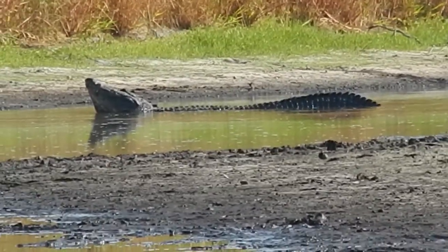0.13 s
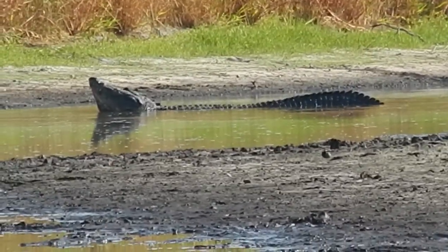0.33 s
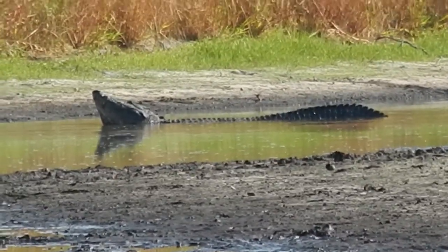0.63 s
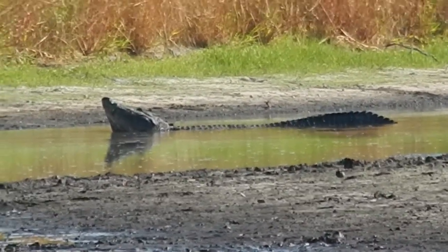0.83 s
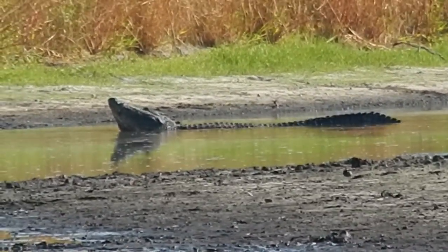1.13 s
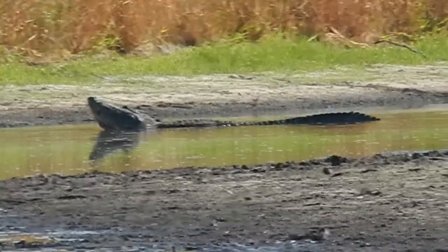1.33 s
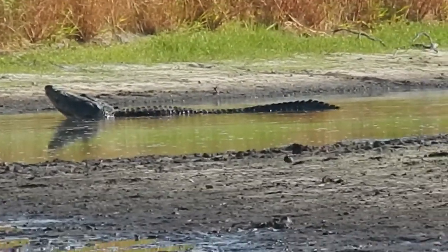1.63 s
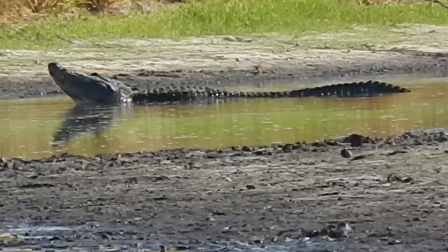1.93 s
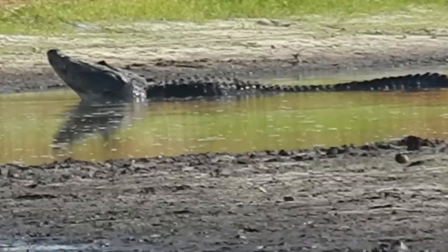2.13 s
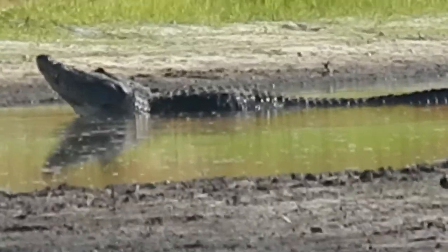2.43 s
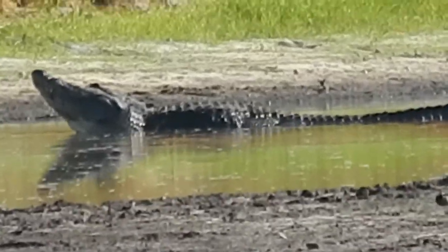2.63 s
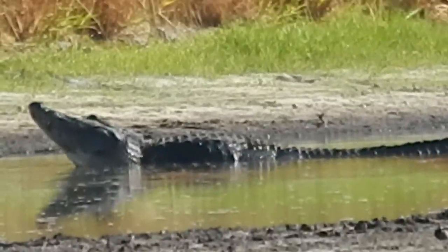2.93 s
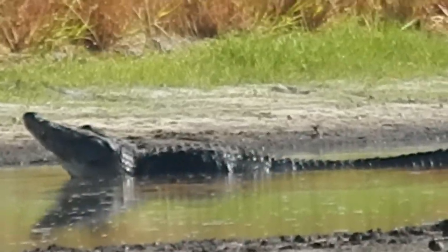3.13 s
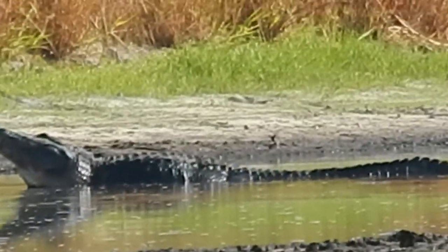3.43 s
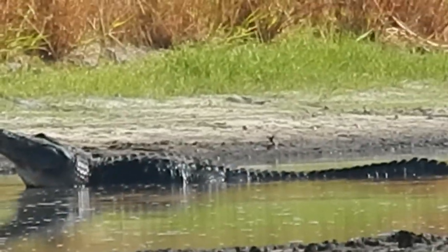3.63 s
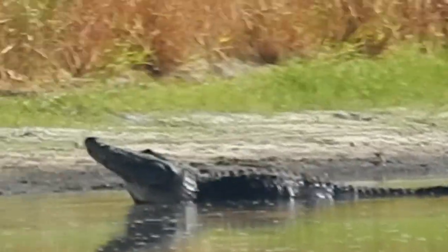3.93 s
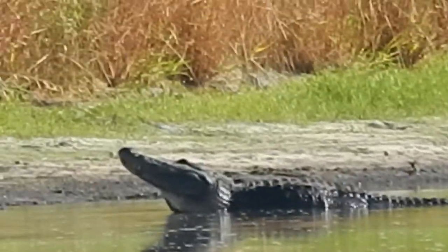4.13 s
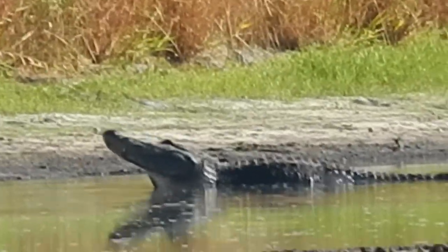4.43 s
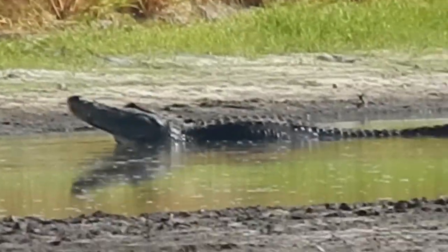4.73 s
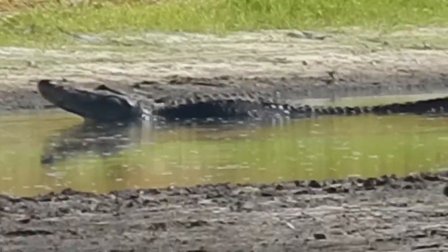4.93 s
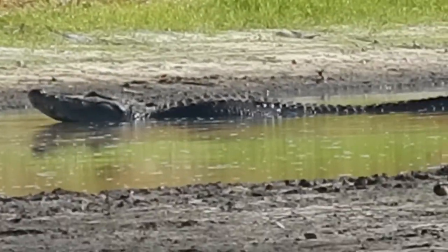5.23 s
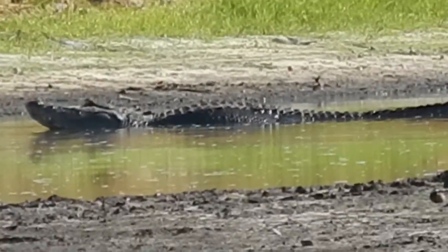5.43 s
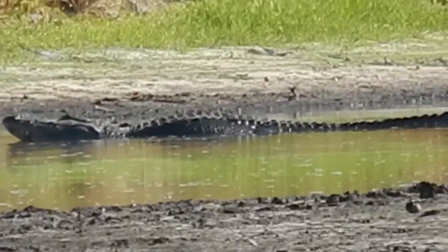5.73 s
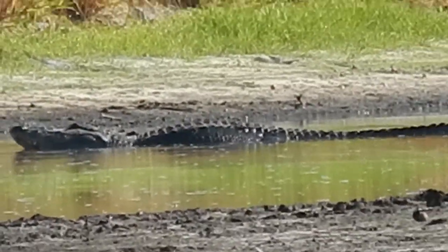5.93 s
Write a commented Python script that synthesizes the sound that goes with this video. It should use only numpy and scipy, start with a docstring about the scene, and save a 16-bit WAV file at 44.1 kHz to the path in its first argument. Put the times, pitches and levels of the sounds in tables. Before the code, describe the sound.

Outdoors at a shallow pond, an alligator's very low, throbbing bellow slows into separate thuds and ends within about a second and a half. Wind rumbles softly and insects chirp high. A bird rattles, then one loud dry plastic click snaps close to the microphone. Thin bird wails follow, each breaking into raspy pulses, then two creaking croaks, while a lens motor whirs faintly.

```python
"""A shallow pond seen from its bank: an alligator ends a low bellow, pulses of vocal-fold closure ringing its throat.
A wading bird rattles, gives three thin harmonic wails that break into rasping pulses, then two creaking calls.
Insects chirp and lisp as noise in narrow resonances; a far bird peeps; wind, far hiss and a far motor lie beneath.
At the camera, a zoom motor ticks faintly, a dry scuff and small ticks pass, and contacts ring the body's modes.
One sharp click there makes the limiter duck."""
import sys
import numpy as np
from scipy import signal
from scipy.fft import rfft, irfft, next_fast_len
from scipy.io import wavfile

SR = 44100
rng = np.random.default_rng(int(sys.argv[2]) if len(sys.argv) > 2 else 0)


def store_pcm(level_fs):
    """Save levels as 16-bit WAV."""
    pcm = np.round(np.clip(level_fs, -1, 1) * 32767).astype(np.int16)
    wavfile.write(sys.argv[1], SR, np.atleast_2d(pcm).T)


N = 267598
TIME = np.arange(N) / SR

# Alligator's vocal-fold closures: (time [s], rate [1/s], peak level before trim and scatter [dB])
BELLOW = [(0, 37.9, -27), (.12, 33.8, -29), (.31, 31.8, -28), (.43, 28.5, -33), (.62, 28.1, -30),
          (.68, 19.5, -33), (.77, 27, -28), (.97, 24.15, -29), (1.32, 20.4, -36)]
# Its throat resonances before narrowing: (frequency [Hz], width [Hz], gain [dB])
GATOR_THROAT = [(106, 40, 7.5), (158, 48, 16.5)]
# Narrowing of the throat during the push: (time [s], factor on the resonances [1])
SQUEEZE = [(0, 0.55), (.15, 0.75), (.3, 0.92), (.7, 1), (1.3, 1)]
# Turbulent rumble under the slaps, before trim: (time [s], level [dB])
RUMBLE = [(0, -37), (.6, -47), (1.2, -51), (1.6, -64)]

# Open air before gain: (time [s], wind level [dB], far hiss level [dB])
AIR = [(0, -44.5, -62.5), (1.2, -47, -62.5), (2.5, -47.5, -62.5), (3.1, -48, -62.5), (4.4, -50, -61.5),
       (5.0, -47.5, -62), (6.07, -50.5, -61.5)]
# Spectrum of the wind: (frequency [Hz], relative level per Hz [dB])
WIND = [(12, -44), (20, -7), (32, -4), (65, 3.5), (97, 0), (136, -3.5), (200, -9.5), (280, -12.5),
        (390, -19.5), (580, -32.5), (1000, -72)]
# Spectrum of the far hiss: (frequency [Hz], relative level per Hz [dB])
HISS = [(180, -32), (300, -9.5), (398, -2.5), (614, -7), (930, -5.5), (1230, -8), (1460, -9.5), (2480, -14),
        (4830, -18), (5610, -13), (6300, -22), (8940, -18.5), (11300, -21.5), (13800, -24), (16000, -28.5)]
# Left-right likeness, negative values counting as none: (frequency [Hz], likeness [1])
LIKENESS = [(60, 0.93), (150, 0.84), (380, 0.45), (950, 0.26), (2380, 0.0013), (5980, -1), (15000, -0.21)]
# Wind puffs on the microphone: (centre time [s], Gaussian spread [s], level before panning [dB])
PUFFS = [(0.164, 0.023, -41.5), (0.551, 0.056, -44.5), (0.928, .015, -47), (1.008, 0.016, -45.5),
         (1.44, 0.027, -51)]

# Near insect chirps over the chorus, before trim: (centre time [s], level [dB])
CHIRPS = [(.12, -63), (.45, -59), (0.768, -61), (1.42, -61), (1.76, -64), (2.03, -63.5), (2.68, -60),
          (3.0, -65), (3.38, -63), (3.58, -63), (4.33, -62), (4.55, -66), (4.84, -64), (5.091, -63),
          (5.3, -62), (5.56, -64.5), (5.86, -60)]
CHIRP_S, CHORUS_DB = 0.14, -69  # chirp length; chorus level before trim and swell
# Peeps of a small far bird: (centre time [s])
PEEPS = [.12, .765, 1.235, 1.37]
# Lisps of a second insect: (centre time [s])
LISPS = [.29, .575, .86, 1.165, 1.47, 1.78, 4.11, 4.37, 4.62, 4.94, 5.21, 5.55, 5.88]

# Contacts on the camera body: (time [s], strength [dB])
CLICKS = [(.449, -35.5), (.982, -41), (2.193, -38.5), (2.1962, -36), (2.2211, -17), (2.2228, -8.5),
          (2.2255, -16.5), (3.956, -46), (5.732, -45.5)]
# Modes of the camera body: (frequency [Hz], gain [dB], 60 dB decay time [s])
BODY = [(229, -17.5, 0.031), (500, -21, 0.01), (800, -25, 0.076), (1300, -14.5, 0.019),
        (1545, -10.5, 0.017), (2024, -16.5, 0.026), (2360, -11, 0.036), (2656, -3, 0.011),
        (3350, -3.5, 0.0089), (4590, -8.5, 0.0059), (5180, -10.5, 0.0047), (7650, -14.5, 0.0029),
        (10100, -13, 0.0028), (11500, -11.5, .005), (13300, -17, .0028)]

# Runs of the bird's rattle: (first note [s], end [s], level before trim and swell [dB], rasp before trim [dB])
RATTLE = [(0.618, .7, -50, -2.5), (1.432, 1.78, -41.5, -2), (2.278, 2.3, -42, -4), (2.665, 2.69, -41, -6.5),
          (3.256, 3.34, -40.5, -4.5), (3.611, 3.64, -44, -6), (4.143, 4.22, -41.5, -3),
          (4.473, 4.5, -39, -7), (5, 5.03, -39.5, -6), (5.255, 5.39, -40.5, -6.5), (5.84, 5.87, -41, -4.5)]
RATTLE_STEP_S, RATTLE_NOTE_S, RATTLE_RELEASE_S = 0.054, 0.019, 0.013  # note spacing, length and release
# A run swells: notes this far from its middle are this much softer
RATTLE_SWELL_S, RATTLE_SWELL_DB = 0.16, 5.5
# Long creaks: (start [s], end [s], pulse rate before jitter [Hz], throat at start [Hz], throat at end [Hz],
# level [dB], roughness [0-1])
CREAKS = [(2.445, 2.51, 171.3, 1210, 1290, -55, .2), (2.491, 2.543, 160, 1810, 1930, -52.5, 0.7),
          (2.578, 2.644, 180, 1890, 1780, -51, .4), (3.528, 3.594, 200, 1160, 1360, -53.5, .7),
          (4.39, 4.447, 196.2, 1240, 1420, -50, 0.61), (5.052, 5.094, 184, 1110, 1220, -41.5, .04),
          (5.09, 5.125, 218, 1370, 1330, -46, .2), (5.146, 5.178, 183, 1080, 1370, -44.5, .12),
          (5.204, 5.226, 220, 1070, 1300, -43.5, .2), (5.891, 5.992, 190, 1130, 1240, -45, .04),
          (5.985, 6.042, 183, 1380, 1150, -48.5, .24), (6.04, 6.072, 223.7, 1520, 1530, -56.5, 0.79)]
CLEAN_RASP_DB, ROUGH_RASP_DB = -3.5, 10  # rasp against throat tone in a clean and in a fully rough creak
# Spectrum of the rasp: (frequency [Hz], relative level per Hz [dB])
RASP = [(500, -24), (900, -3), (1300, -4), (1800, -4), (2100, -9.5), (2450, -9), (2900, -8.5), (3900, -3.5),
        (4700, -7.5), (6500, -17.5), (8000, -21.5), (10200, -19), (12000, -29), (16000, -58)]

# Swells of the far motor: (start [s], end [s], initial speed [Hz], final speed [Hz], level [dB],
# fade [dB/s], step from one order to the next [dB])
MOTOR = [(1.746, 2.28, 51.07, 49.33, -47.5, 1.5, -3.5), (2.253, 3.0, 48.8, 44.82, -57.5, 9.5, 3),
         (2.955, 4.503, 65.6, 65.14, -54.5, 6, -3.5), (4.947, 6.117, 76.78, 88, -43.5, 7, -27)]
MOTOR_SETTLE_S = 0.348  # time constant of the approach to the final speed

# Zoom motor: (time [s], tick rate [1/s], level [dB])
ZOOM = [(2.0, 52, -100), (2.03, 38, -64.5), (2.3, 46, -61), (2.6, 56, -58.5), (3.05, 50, -62.5),
        (3.5, 48, -60), (3.86, 48, -61.5), (3.89, 56, -100)]
# Spectrum of its ticks and whirr: (frequency [Hz], relative level per Hz [dB])
WHIRR = [(3000, -51), (7000, -23), (10300, -12), (11200, 3.5), (11700, -4), (12100, -5), (12700, -1),
         (13200, -1), (15500, -5), (16500, -3.5)]

# Notes of the wails, high ones breaking to lower ones: (start [s], end [s], initial pitch [Hz], sag [Hz],
# level [dB], second partial before trim [dB], brightness of the overtones [dB])
WAILS = [(2.283, 2.316, 1180, 7, -47, -9.5, -15.5), (2.347, 2.404, 1214, 15, -45, -13.5, -20.5),
         (2.412, 2.526, 1105, 17.5, -44, -8.5, -24), (2.573, 2.612, 1091, 39, -43, -10.5, -31),
         (3.316, 3.498, 1286, 96.5, -44.5, -10.5, -9), (3.502, 3.553, 1104, 58, -41, -16, -21),
         (4.196, 4.344, 1255, 66, -42, -17.5, -13.5), (4.352, 4.394, 1088, 32, -39.5, -17.5, -19.5)]
# Overtones of a wail before trim and brightness: (multiple of the pitch [1], relative level [dB])
OVERTONES = [(3, 8), (4, -7.5), (5, -7.5), (6, -19.5), (7, -15), (8, -13.5), (9, -19), (10, -24)]
# Cracks in the wail, every other cycle weaker: (time [s], depth [0-1])
CRACK = [(4.26, 0.08), (4.285, 0.75), (4.32, 0.15), (4.34, 0.05)]
WAIL_ARCH_DB = 2.5  # a note is this much softer at its ends
# The low partials fade as the note slides through this pitch
WEAK_HZ, WEAK_WIDTH_HZ, WEAK_DB = 1237.7, 15, 10.5

# Resonances of one dry scuff: (start [s], end [s], frequency [Hz], width [Hz], level [dB])
SCUFF = [(3.955, 3.99, 370, 210, -53), (4.015, 4.062, 830, 110, -58.5), (3.953, 4.072, 1917, 250, -58.5),
         (4.003, 4.05, 2500, 370, -62)]
# Crisp ticks before trim: (onset time [s], level [dB])
TICKS = [(4.9243, -41), (4.971, -46), (5.268, -40), (5.317, -39.5), (5.48, -50)]

# Echoes from the banks: (delay [s], level [dB])
BANKS = [(.017, -12.5), (0.041, -15), (.078, -28), (.125, -35)]
CUTOFF_HZ = 15900  # top of the recorded band


def from_db(db):
    """Decibel law: 20 dB is a tenfold amplitude."""
    return 10 ** (np.asarray(db) / 20)


def rms_one(x):
    """Normalization: scale to a root-mean-square amplitude of 1."""
    return x / np.sqrt(np.mean(x ** 2) + 1e-20)


def in_time(rows):
    """Linear interpolation: read every column of a time curve at each sample."""
    s, *columns = np.transpose(rows)
    return [np.interp(TIME, s, c) for c in columns]


def at_hz(points, hz):
    """Logarithmic frequency axis: interpolate a spectrum on it."""
    f, value = np.transpose(points)
    return np.interp(np.log(np.maximum(hz, 1)), np.log(f), value)


def colour(x, spectrum):
    """Linear filtering: multiply the Fourier spectrum by a smooth gain, then scale to rms 1."""
    size = next_fast_len(N)
    gain = from_db(at_hz(spectrum, np.fft.rfftfreq(size, 1 / SR)))
    return rms_one(irfft(rfft(x, size) * gain, size)[..., :N])


def cut(x, hz, kind, order=2):
    """Butterworth filtering: a maximally flat passband."""
    return signal.sosfilt(signal.butter(order, hz, kind, fs=SR, output="sos"), x + 1e-18)


def resonance(x, hz, width_hz):
    """Damped resonance: a pole pair whose radius sets the width, with unit gain at its peak."""
    r = np.exp(-np.pi * width_hz / SR)
    zeros = np.array([1, 0, -1]) * (1 - r * r) / 2
    poles = [1, -2 * r * np.cos(2 * np.pi * hz / SR), r * r]
    return signal.lfilter(zeros, poles, x + 1e-18)


def drift(rate):
    """Random modulation: chance values, rate of them a second, joined by lines and scaled to rms 1."""
    knots = rng.standard_normal(N // 8)
    return rms_one(np.interp(TIME * rate, np.arange(len(knots)), knots))


def gate(t, start, end, edge):
    """Amplitude envelope: 1 between start and end, with sloping edges."""
    rise = np.clip((t - start) / edge + 0.5, 0, 1)
    return rise * np.clip((end - t) / edge + 0.5, 0, 1)


def place(x, pan_db, lag_ms):
    """Stereo localization: level and arrival time differ at two ports, the left one hearing later."""
    left = np.interp(TIME - lag_ms / 1000, TIME, x) * from_db(pan_db / 2)
    return np.array([left, x * from_db(-pan_db / 2)])


def air_noise(spectrum):
    """Interchannel coherence: shared and opposed noise make the sides alike in the bass, less so above."""
    size = next_fast_len(N)
    alike = np.clip(at_hz(LIKENESS, np.fft.rfftfreq(size, 1 / SR)), 0, 0.98)
    mid, side = rfft(rng.standard_normal((2, size)))
    pair = np.sqrt(1 + alike) * mid + np.sqrt(1 - alike) * side * [[1], [-1]]
    return colour(irfft(pair, size)[:, :N], spectrum)


def outdoors(x, scatter_db, t60, dull_hz):
    """Reflection and scattering: dull echoes from the banks and a decaying tail from the reeds."""
    dull = cut(x, dull_hz, "low", order=1)
    echoes = sum(from_db(db) * np.interp(TIME - delay, TIME, dull, left=0) for delay, db in BANKS)
    tail = rng.standard_normal((2, SR)) * from_db(-60 * TIME[:SR] / t60)
    tail /= np.sqrt(np.sum(tail ** 2, axis=1, keepdims=True))
    return echoes + from_db(scatter_db) * signal.fftconvolve(dull[None], tail, axes=1)[:, :N]


def gator_throat(x, squeeze=1, top_hz=285):
    """Vocal-tract resonance: broad low modes; the closed mouth lets little treble out."""
    rings = sum(from_db(db) * resonance(x, hz * squeeze, width) for hz, width, db in GATOR_THROAT)
    return cut(rings, top_hz, "low", order=7)


def alligator(slap_db=-2.5, rumble_db=-7, uneven_db=2.15, jitter_s=0.00078):
    """Source and filter: fold closures, slowing overall, ring the throat over turbulent noise."""
    rumble = rms_one(gator_throat(rng.standard_normal(N)))
    out = from_db(in_time(RUMBLE)[0] + rumble_db) * rumble
    rate, db = in_time(BELLOW)
    new_cycle = np.diff(np.round(np.cumsum(rate) / SR))
    closures = np.flatnonzero(new_cycle * (TIME[1:] < BELLOW[-1][0]))
    for at, (colouring, size, late) in zip(closures, rng.standard_normal((64, 3))):
        squeeze = np.interp(at / SR, *np.transpose(SQUEEZE)) * (1 + 0.037 * colouring)
        slap = gator_throat(-signal.unit_impulse(SR // 8), squeeze)
        start = max(at + int(jitter_s * late * SR), 0)
        level = from_db(db[at] + slap_db + uneven_db * size)
        out[start:start + len(slap)] += level * slap / np.abs(slap).max()
    return out


def open_air(wind_gain_db=0.0, hiss_gain_db=6.5, puff_hz=45, puff_width_hz=35):
    """Flow noise: low wind, far hiss, and puffs that buffet the left port most."""
    wind_db, hiss_db = in_time(AIR)
    wind_level = from_db(wind_db + wind_gain_db + 0.19 * drift(8))
    wind = wind_level * air_noise(WIND) * from_db([[1.0], [-1.0]])
    hiss = from_db(hiss_db + hiss_gain_db) * air_noise(HISS)
    push = sum(from_db(db) * np.exp(-0.5 * ((TIME - s) / spread) ** 2) for s, spread, db in PUFFS)
    rumble = resonance(rng.standard_normal(N), puff_hz, puff_width_hz)
    eddies = rms_one(cut(rumble, 95, "low"))
    return wind + hiss + place(push * eddies, pan_db=20.0, lag_ms=0.11)


def insects(hz=5690, width_hz=420, stroke_rate=78, depth=0.53, level_db=-2.5, edge_s=0.063, swell_db=-3.0):
    """Amplitude modulation: wing strokes throb in a narrow resonance; chirps rise from a chorus."""
    strokes_per_s = stroke_rate * (1 + 0.029 * drift(3))
    strokes = 1 + depth * np.sin(2 * np.pi * np.cumsum(strokes_per_s) / SR)
    song = resonance(rng.standard_normal((2, N)) * strokes, hz, width_hz)
    song = rms_one(resonance(song, hz, width_hz))
    chirps = sum(from_db(db) * gate(TIME, s - CHIRP_S / 2, s + CHIRP_S / 2, edge_s) for s, db in CHIRPS)
    chorus = from_db(CHORUS_DB + swell_db * drift(14))
    return from_db(level_db) * np.hypot(chirps, chorus) * song


def peeps(hz=3960, length_s=0.024, edge_s=0.01, level_db=-62):
    """Pure tone: short, level whistles with a slight random waver of pitch."""
    tone = np.sin(2 * np.pi * np.cumsum(hz * (1 + 0.0064 * drift(200))) / SR)
    notes = sum(gate(TIME, s - length_s / 2, s + length_s / 2, edge_s) for s in PEEPS)
    return place(from_db(level_db) * notes * tone, pan_db=2, lag_ms=0.068)


def lisps(hz=14100, width_hz=1100, spread_s=0.017, level_db=-66, uneven_db=2.0):
    """Narrow-band noise: short Gaussian swells of a very high resonance."""
    swells = sum(from_db(uneven_db * rng.standard_normal()) * np.exp(-0.5 * ((TIME - s) / spread_s) ** 2)
                 for s in LISPS)
    return from_db(level_db) * swells * rms_one(resonance(rng.standard_normal((2, N)), hz, width_hz))


def camera_click(grit_db=-22, grit_s=0.0021, level_db=0.0):
    """Modal vibration: quick contacts, each with a little grit, ring the plastic body."""
    force, t = np.zeros(N), TIME[:SR // 64]
    for s, db in CLICKS:
        grit = from_db(grit_db) * rng.standard_normal(len(t)) * np.exp(-t / grit_s)
        blow = signal.unit_impulse(len(t)) + grit
        force[int(s * SR):int(s * SR) + len(t)] += from_db(db + level_db) * blow
    out = np.zeros(N)
    for k, (hz, db, t60) in enumerate(BODY):
        r, w = from_db(-60 / (t60 * SR)), 2 * np.pi * hz / SR
        ring = signal.lfilter([0, np.sin(w)], [1, -2 * r * np.cos(w), r * r], force + 1e-18)
        out += (-1) ** k * from_db(db) * ring  # neighbouring modes have opposite sign
    return place(out, pan_db=-8.5, lag_ms=0.14)


def creak(t, rate, start_hz, end_hz, rough, width_hz=215, jitter=0.22, rise=0.043, upper_hz=1900,
          upper_share=0.82):
    """Pulsed excitation: uneven pulses ring a throat that rises in pitch; returns ring and raw pulses."""
    chance = rng.standard_normal((2, 64))
    periods = np.clip(1 + jitter * rough * chance[0], 0.4, 2) / rate
    starts = np.cumsum(periods) - periods[0]
    which = np.searchsorted(starts, t, side="right") - 1
    age = t - starts[which]
    hz = np.linspace(start_hz, end_hz, len(t)) * (1 + rise * (age * rate - 0.5))
    size = from_db(2 * rough * chance[1])[which]
    # The membranes open and close smoothly
    opening = np.sqrt(np.abs(np.sin(np.pi * age / periods[which])))
    # Rough pulses also wake the second resonance
    upper = upper_share * rough * np.sin(2 * np.pi * upper_hz * age)
    ring = size * opening * np.exp(-np.pi * width_hz * age) * (np.sin(2 * np.pi * hz * age) + upper)
    puffs = rms_one(rng.standard_normal(SR // 4)[:len(t)] * np.exp(-age * rate))
    impulses = rms_one(1.0 * (np.diff(which, prepend=-1) > 0))
    share = np.clip(0.12 + rough, 0, 1)  # noise power among the pulses
    pulses = np.sqrt(1 - share) * impulses + np.sqrt(share) * puffs
    return rms_one(ring), rms_one(size * pulses)


def creaks(rattle_db=-7.5, rattle_rasp_db=4.0, rattle_rate=300, rattle_start_hz=1150, rattle_end_hz=1300,
           rattle_rough=0.598, attack=0.00071, release=RATTLE_RELEASE_S):
    """Rough phonation: long creaks, raspier the rougher they are, and evenly spaced rattle notes."""
    notes = [(*row, np.interp(row[-1], [0, 1], [CLEAN_RASP_DB, ROUGH_RASP_DB])) for row in CREAKS]
    for first, until, db, rasp_db in RATTLE:
        middle = (first + until - RATTLE_NOTE_S) / 2
        for s in np.arange(first, until, RATTLE_STEP_S):
            note_db = db + rattle_db - RATTLE_SWELL_DB * ((s - middle) / RATTLE_SWELL_S) ** 2
            notes.append((s, s + RATTLE_NOTE_S, rattle_rate, rattle_start_hz, rattle_end_hz,
                          note_db, rattle_rough, rasp_db + rattle_rasp_db))
    throat, rasp = np.zeros((2, N))
    for start, end, rate, start_hz, end_hz, db, rough, rasp_db in notes:
        live = (TIME >= start) & (TIME < max(end, start + release) + release / 2)
        t = TIME[live] - TIME[live][0]
        level = from_db(db) * np.minimum(t / attack, 1) * np.minimum((t[-1] - t) / release, 1)
        ring, pulses = creak(t, rate, start_hz, end_hz, rough)
        throat[live] += level * ring
        rasp[live] += level * from_db(rasp_db) * pulses
    return cut(throat, 816, "high", order=4) + colour(rasp, RASP) * np.std(rasp)


def far_motor(waver_db=1.26, edge_s=0.089):
    """Harmonic orders: the motor's lowest three; each swell glides toward a new speed and fades."""
    out = np.zeros(N)
    for start, end, from_hz, to_hz, db, fade_db, step_db in MOTOR:
        age = np.maximum(TIME - start, 0)
        hz = to_hz + (from_hz - to_hz) * np.exp(-age / MOTOR_SETTLE_S)
        phase = 2 * np.pi * np.cumsum(hz * (1 + 0.00602 * drift(12))) / SR
        orders = np.zeros(N)
        for k in range(3):
            order_db = db - fade_db * age + k * step_db + waver_db * drift(15)
            orders += from_db(order_db) * np.sin((k + 1) * phase)
        out += np.sqrt(2) * orders * gate(TIME, start, end, edge_s)
    return place(out, pan_db=1.0, lag_ms=0.042)


def zoom_motor(tick_share=0.17, whirr=0.29):
    """Periodic excitation: one bright noise tick a turn over a faint whirr."""
    rate, db = in_time(ZOOM)
    turn = np.cumsum(rate) / SR % 1
    noise = rng.standard_normal((2, N)) * (whirr + np.exp(-turn / tick_share))
    return from_db(db) * colour(noise, WHIRR)


def wails(jitter=0.0065, wander=0.0032, shimmer_db=1.0, edge=0.007, level_db=0.0, overtone_db=-0.5,
          sag_power=2.2, flicker_db=3.0):
    """Harmonic series: thin notes hold their pitch, then sag ever faster."""
    out = np.zeros(N)
    waver = 1 + jitter * drift(500) + wander * drift(45)
    flutter = shimmer_db * drift(160)
    crack = in_time(CRACK)[0]
    flickers = [flicker_db * drift(40) for _ in OVERTONES]  # each overtone comes and goes on its own
    for start, end, pitch, sag, db, second_db, bright_db in WAILS:
        on = gate(TIME, start - edge / 2, end + edge / 2, edge)
        live = on > 0
        along = np.linspace(0, 1, live.sum())
        hz = pitch - sag * along ** sag_power
        phase = 2 * np.pi * np.cumsum(hz * waver[live]) / SR
        weak = from_db(-WEAK_DB * np.exp(-0.5 * ((hz - WEAK_HZ) / WEAK_WIDTH_HZ) ** 2))
        upper = 0
        for (k, level), flicker in zip(OVERTONES, flickers):
            partial_db = level + overtone_db + flicker[live] + bright_db * np.sqrt(3 / k)
            upper = upper + from_db(partial_db) * np.sin(round(k) * phase)
        # Half-integer partials repeat only every second cycle
        halves = crack[live] * (np.sin(5 * phase / 2) + 0.5 * np.sin(3 * phase / 2))
        lower = np.sin(phase) + from_db(second_db + 1.5) * np.sin(2 * phase) + halves
        tone = weak * lower + upper
        note_db = db + level_db + flutter[live] - WAIL_ARCH_DB * (2 * along - 1) ** 2
        out[live] += np.sqrt(2) * tone * on[live] * from_db(note_db)
    return out


def scuff():
    """Friction noise: a faint rub heard through a few resonances."""
    out = np.zeros(N)
    for start, end, hz, width, db in SCUFF:
        rub = resonance(resonance(rng.standard_normal(N), hz, width), hz, 2 * width)
        out += from_db(db) * gate(TIME, start, end, 0.0075) * rms_one(rub)
    return place(out, pan_db=0, lag_ms=0.06)


def ticks(hz=8300, width_hz=3500, decay_s=0.0027, level_db=-8):
    """Exponential decay: tiny bright noise bursts that die at once."""
    bursts = sum(from_db(db) * (TIME >= s) * np.exp(-np.abs(TIME - s) / decay_s) for s, db in TICKS)
    bright = resonance(rng.standard_normal((2, N)), hz, width_hz)
    return from_db(level_db) * bursts * rms_one(resonance(bright, hz, width_hz))


def scene():
    """Superposition: animals across the water, small noises at the camera, the marsh all round."""
    gator, bird = alligator(), wails() + creaks()
    animals = place(gator, pan_db=1.0, lag_ms=0.045) + place(bird, pan_db=1.0, lag_ms=0.11)
    space = outdoors(bird + 0.5 * gator, scatter_db=-13, t60=0.5, dull_hz=3500)
    marsh = open_air() + insects() + peeps() + lisps() + far_motor()
    small_noises = camera_click() + zoom_motor() + scuff() + ticks()
    return animals + space + marsh + small_noises


def record(dry, threshold_db=-10, release_db_per_s=25, attack_s=0.0023):
    """Peak limiting and band limiting: gain ducks on loud peaks, recovers slowly; the top is cut."""
    over = np.maximum(20 * np.log10(np.abs(dry).max(axis=0) + 1e-9) - threshold_db, 0)
    # Hold each excess and let it fall at a constant rate
    held = np.maximum.accumulate(over + release_db_per_s * TIME) - release_db_per_s * TIME
    r = np.exp(-1 / (attack_s * SR))
    ducked = dry * from_db(-signal.lfilter([1 - r], [1, -r], held))
    return signal.sosfilt(signal.ellip(10, 0.1, 80, CUTOFF_HZ, fs=SR, output="sos"), ducked)


dry = scene()
out = record(dry)
store_pcm(out)
```